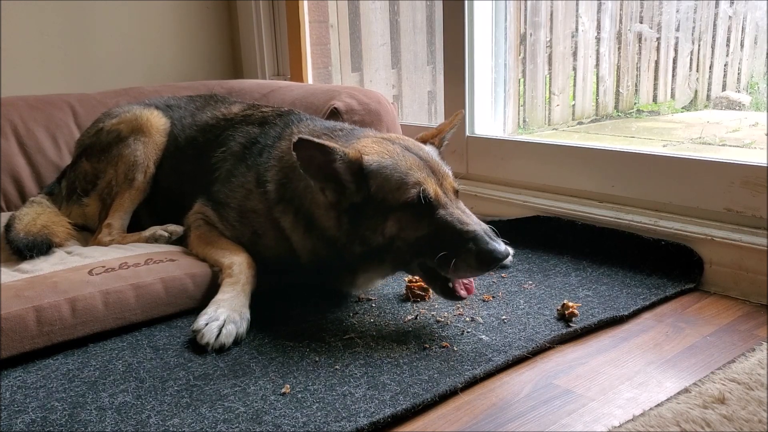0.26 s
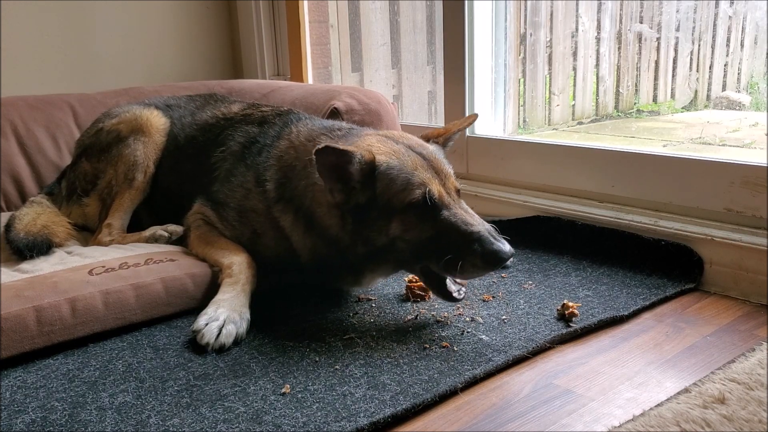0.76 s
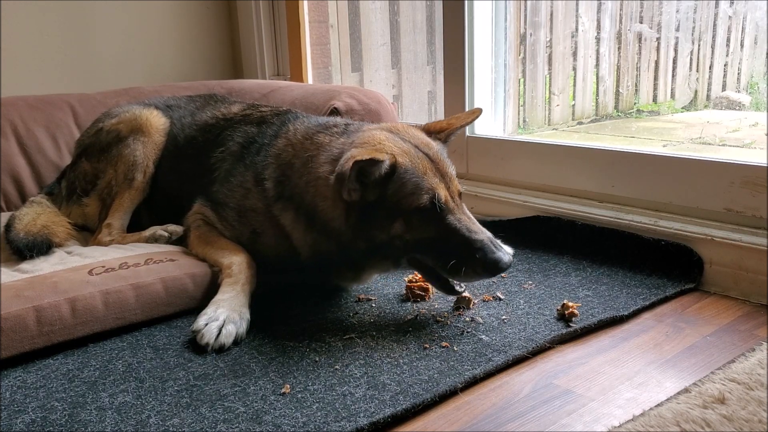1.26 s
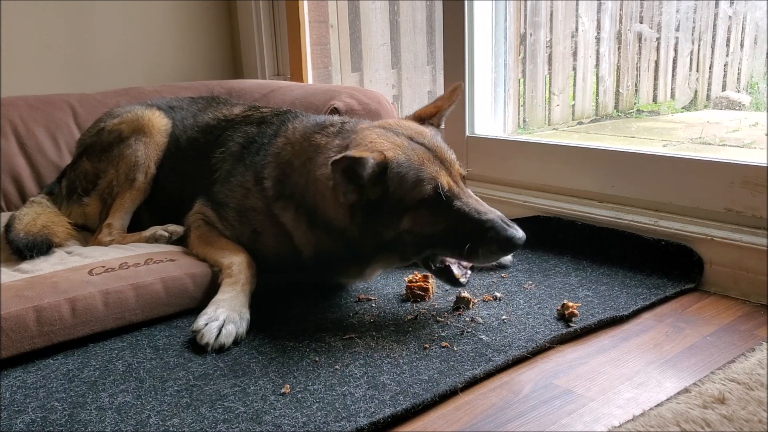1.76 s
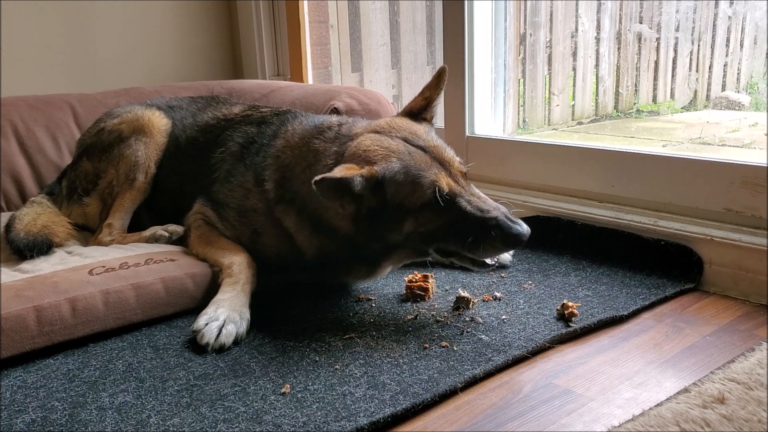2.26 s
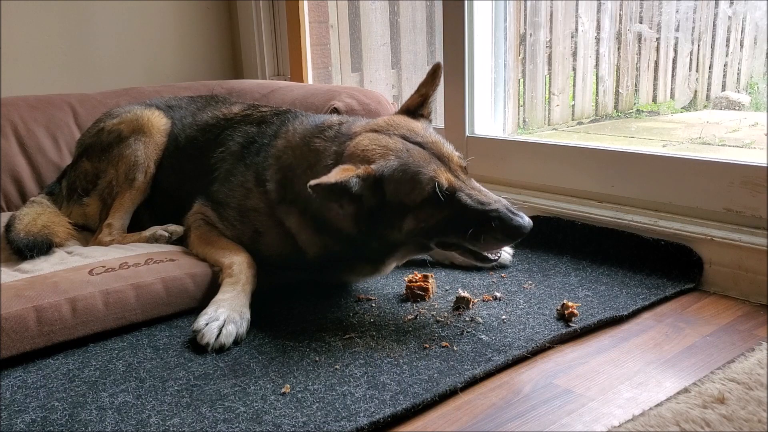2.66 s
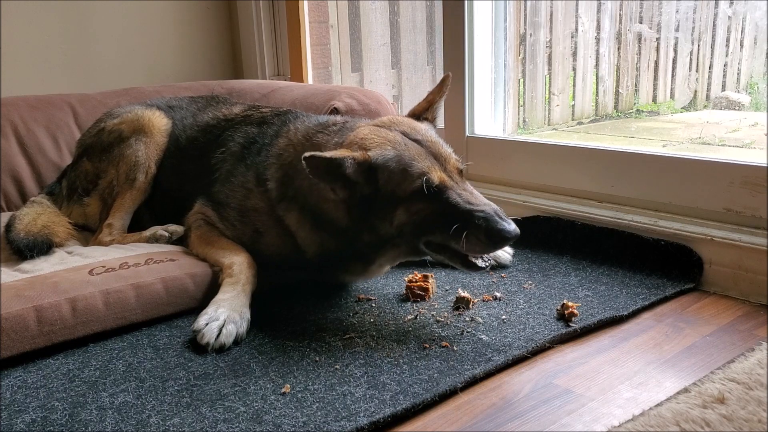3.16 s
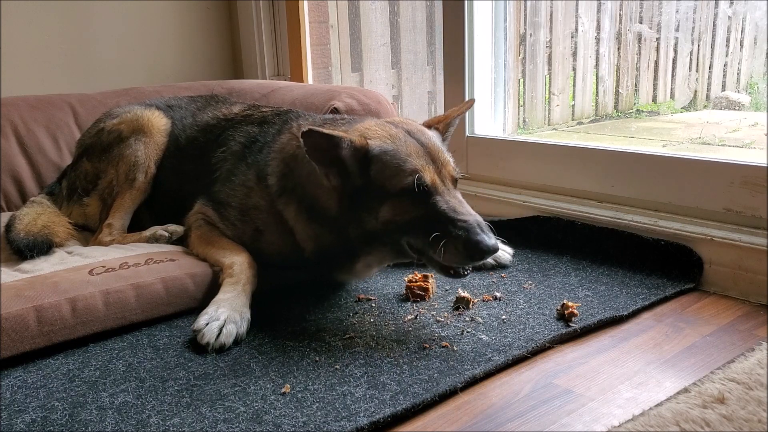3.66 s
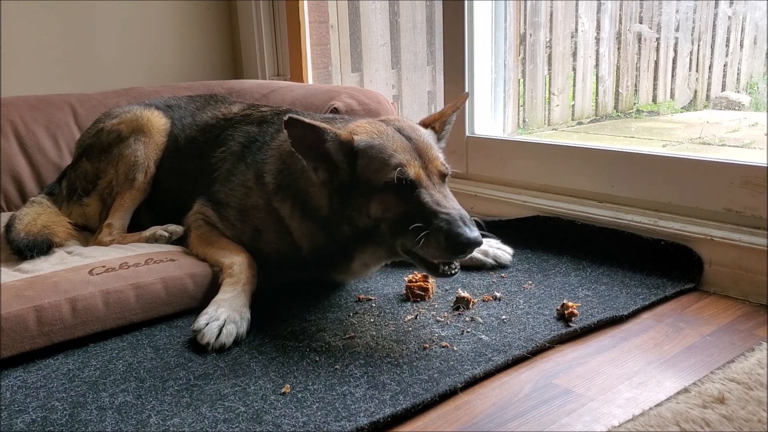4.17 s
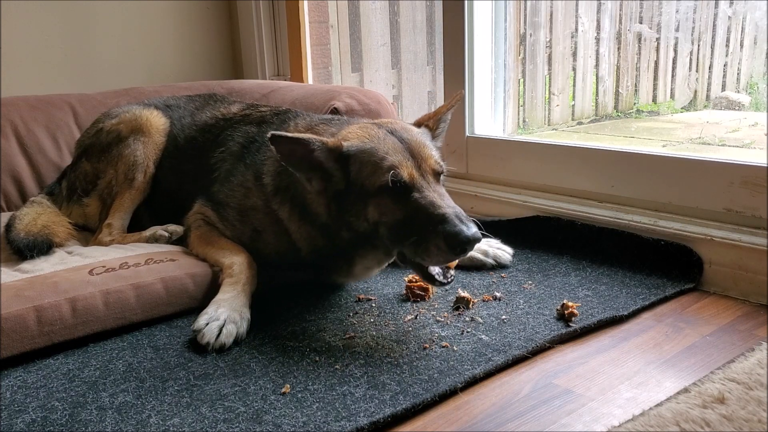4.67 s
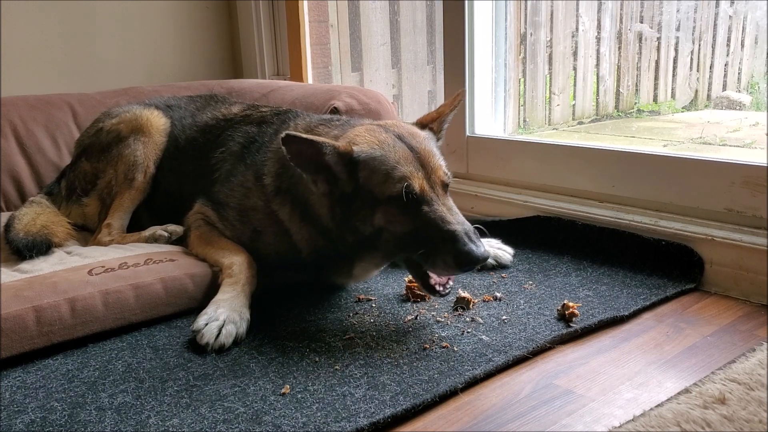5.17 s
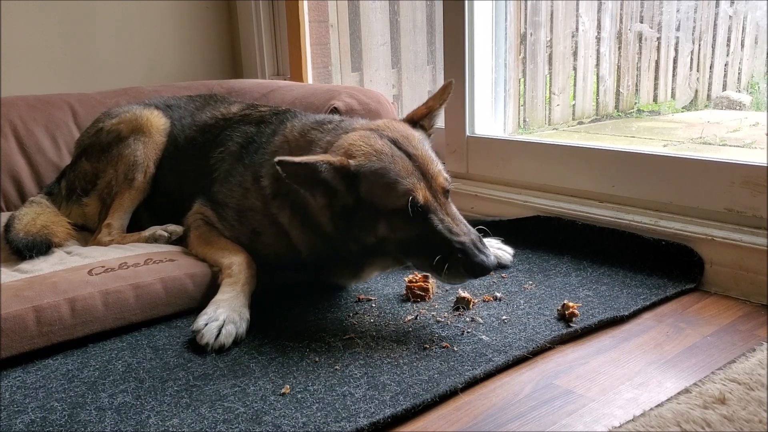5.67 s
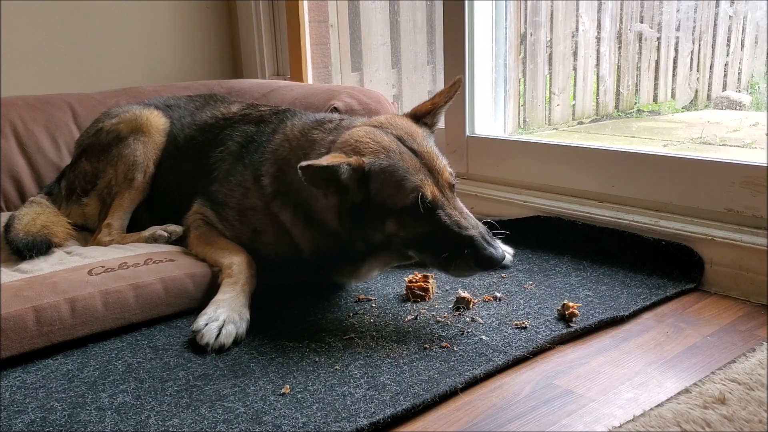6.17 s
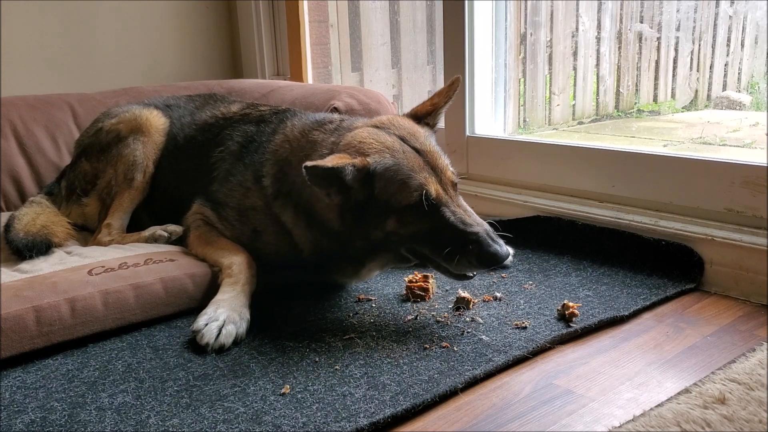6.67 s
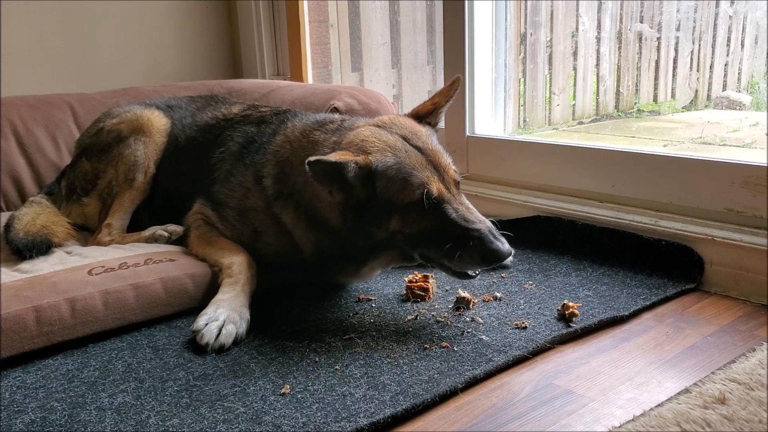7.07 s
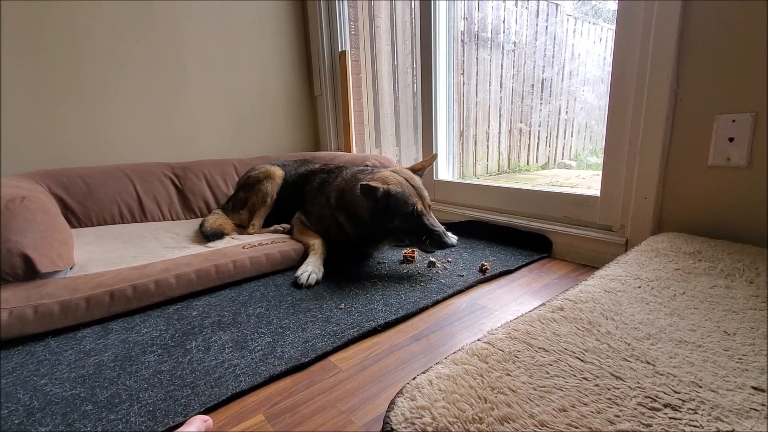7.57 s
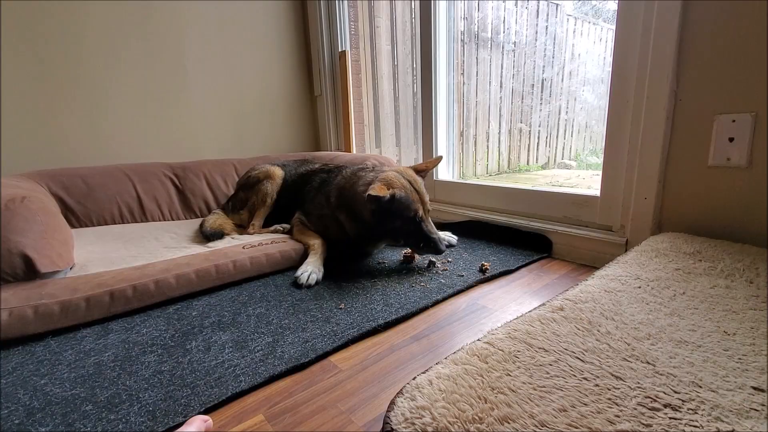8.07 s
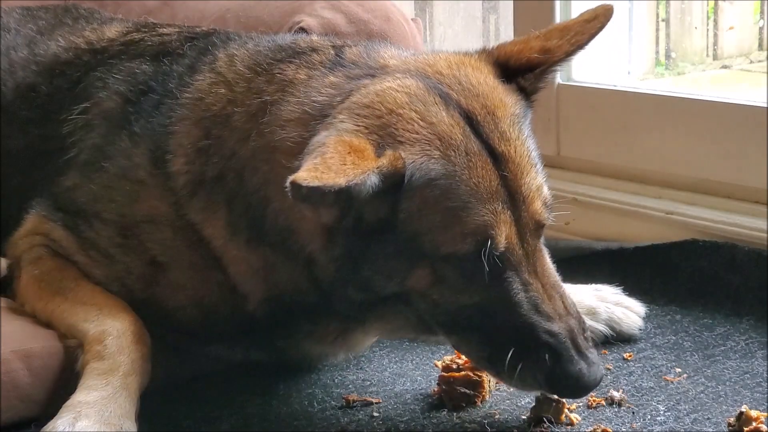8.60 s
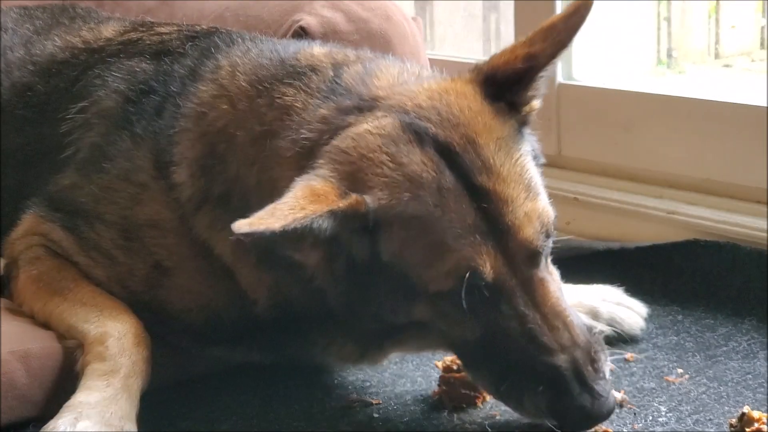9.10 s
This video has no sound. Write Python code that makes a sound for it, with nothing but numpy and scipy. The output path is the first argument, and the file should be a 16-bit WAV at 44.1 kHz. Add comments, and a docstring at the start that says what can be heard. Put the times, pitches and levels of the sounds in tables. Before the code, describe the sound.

Hard bone splits in a dog's jaws with ragged snaps, hollow knocks and short gritty grinding. Between irregular bites the lips and tongue make light, wet clicks and brief squelches. The strongest cracks come shortly after three seconds; the ending fades to faint licking. Heard close up in a quiet furnished room with short reflections, soft air rumble, steady low hum and faint hiss.

```python
"""Dog chewing a dried bone

A dog by a glass door cracks a hard dried bone: ragged noise volleys ring the bone and mouth, with jolts of the jaw.
Random clicks make its crumbs and scrapes; bursts and pops through mouth resonances make smacks and squelches.
Quick echoes off floor and door thicken the bites and licks, and a noise tail makes the small room ring briefly.
Underneath lie shaped noise for still air, a steady appliance hum and a faint hiss that rises with the cracks."""
import sys
import numpy as np
from scipy import signal
from scipy.fft import rfft, irfft
from scipy.io import wavfile
from scipy.ndimage import uniform_filter1d

SR = 44100
rng = np.random.default_rng(int(sys.argv[2]) if len(sys.argv) > 2 else 0)


def wav_out(sig):
    """Save sig, one row per channel (or a flat mono array), as 16-bit PCM at SR to the path in sys.argv[1]."""
    wavfile.write(sys.argv[1], SR, np.round(np.clip(np.atleast_2d(sig).T, -1, 1) * 32767).astype(np.int16))


N = 411894  # length in samples

# Fractures of the bone, one a row:
# start_s, level_db (knock and snap together), brightness_db (snap over hollow knock)
FRACTURES = [(0.0087, -52, 11), (0.035, -46.5, 15), (0.0715, -50, 1), (0.1074, -46, 4), (0.3735, -51, 10.5),
             (0.4176, -39, 12), (0.447, -36, 7), (0.4564, -41, 5), (0.4673, -42.5, 4), (0.4962, -48, -15),
             (0.5549, -45.5, 17), (0.5881, -39, -17), (0.5917, -34, 0.5), (1.0504, -55.5, 6),
             (1.0666, -40, 2), (1.1772, -60, 8), (1.304, -62.5, 0), (2.3554, -58.5, 4.5), (2.381, -67, 8),
             (3.1195, -55, 4), (3.1607, -42.5, 1.5), (3.3221, -26, 6.5), (3.417, -23.5, 4.5),
             (3.4285, -38, 5), (3.4742, -30.5, -4), (4.185, -38, 4), (4.205, -39.5, 1.5), (4.521, -50, 3),
             (4.5777, -60, 8), (4.6048, -40.5, 2.5), (4.868, -62, 44), (5.0142, -51.5, -2.5),
             (5.2708, -60.5, 21), (5.306, -46.5, 18.5), (5.336, -43.5, 11.5), (5.355, -39, 9.5),
             (5.3656, -37.5, 6.5), (5.4529, -48.5, -10), (5.4682, -35, -2.5), (6.5986, -50, -2.5),
             (6.6406, -43, -7), (6.891, -59.5, 30), (7.166, -33, 13), (7.1756, -47, 4),
             (7.241, -31.5, -6.5), (7.2924, -38.5, -2), (7.2994, -42, 0), (7.6127, -53.5, 3.5),
             (7.6941, -46.5, 12), (7.7291, -35, 2), (7.7394, -38, -7), (8.1453, -33.5, -5),
             (8.1942, -33.5, -3.5), (8.2672, -42.5, 5), (8.297, -48.5, -11)]


def fractures(crack_db=0, crack_room_db=0, thump_db=3, thinning=0.22, shift=0.03):
    """Thin pieces snap and splinter, thick ones knock, and each jolts the jaw: (near, to the room, jaw)."""
    bone, bone_far, jaw = np.zeros((3, 2, N))
    slips = rng.standard_normal(len(FRACTURES))
    for (s, level_db, bright_db), slip in zip(FRACTURES, slips):
        hollow_hz, jaw_hz, thud_db, splinter_db = grip(s)
        knock_db = -10 * np.log10(1 + amp(bright_db) ** 2)  # knock and snap share the level
        snap_db = knock_db + bright_db
        tilt_db = thinning * bright_db  # a brighter crack has less thud and more splinter
        parts_db = level_db + np.array([thud_db - tilt_db, knock_db, snap_db, splinter_db + tilt_db])
        slipped_hz = hollow_hz * np.exp(shift * slip)  # the piece slips a little at each crack
        start, near, far = crack(s, parts_db + crack_db, slipped_hz)
        add(bone, start, near)
        add(bone_far, start, far * amp(crack_room_db))
        add(jaw, s, thump(parts_db[0] + thump_db, jaw_hz))
    return bone, bone_far, jaw


def crack(s, parts_db, hollow_hz, run_s=.0011, trail_s=.032, trail=.05, lead=.06, lead_s=.0018,
          ragged=.7, scatter=.7, size=4096):
    """Bone starts to give, splits in a ragged volley and sheds splinters: (start s, near, to the room)."""
    start = size // 16
    t = (np.arange(size) - start) / SR
    breaks, splinters, chance = rng.standard_normal((3, size))
    breaks *= np.exp(ragged * chance.clip(-2, 2))
    giving = lead * np.exp(-abs(t) / lead_s)
    splitting = np.exp(-abs(t) / run_s)
    volley = evened(breaks) * np.where(t < 0, giving, splitting)
    debris = evened(splinters * (abs(splinters) > 2.9))  # only the rare large values
    volley += debris * trail * np.exp(-abs(t) / trail_s) * (t > 0)  # a few splinters snap off later
    near = near_echoes(volley)
    # summed over all directions, the volley reaches the walls almost as one plain click
    far = (t == 0) + scatter * evened(near) / np.sqrt(size)
    return s - start / SR, voiced(near, parts_db, hollow_hz), voiced(far, parts_db, hollow_hz)


# Band edges of a crack, from thud through knock and snap to splinter: edge_hz
PART_EDGES_HZ = [130, 450, 1800, 6000, 16000]
# Ring of the bone in the jaws, before the bands are levelled: freq_hz, gain_db
BONE_RING = [(60, -3.5), (130, -1.5), (190, 6), (260, -5), (350, 3.5), (480, 0), (700, 2.5), (1100, 2),
             (1500, -.5), (2000, 1), (4500, 2.5), (7000, -4), (9800, 3.5), (16000, -8.5)]


def voiced(x, parts_db, hollow_hz, hollow=0.94, hollow_q=5, body_s=0.006):
    """The hollow of bone and mouth rings, then each band is set to its level, held over body_s."""
    size = x.shape[1]
    ringing = signal.lfilter(*signal.iirpeak(hollow_hz, hollow_q, SR), x)
    x = colour(x + hollow * ringing, BONE_RING)
    power = 2 * (abs(rfft(x)) ** 2).mean(0) / (size * body_s * SR)
    hz = np.fft.rfftfreq(size, 1 / SR)
    own_db = 10 * np.log10(np.histogram(hz, PART_EDGES_HZ, weights=power)[0])
    centres = np.sqrt(np.multiply(PART_EDGES_HZ[1:], PART_EDGES_HZ[:-1]))
    return colour(x, np.c_[centres, parts_db - own_db])


def thump(scale_db, hz, fade_s=0.0063, rise_s=0.0028, size=2048):
    """Skull and jaw shudder for a few cycles: a sine that swells and dies, alike on both sides."""
    t = np.arange(size) / SR
    envelope = (1 - np.exp(-t / rise_s)) * np.exp(-t / fade_s)
    return amp(scale_db) * np.tile(np.sin(2 * np.pi * hz * t) * envelope, (2, 1))


# Bites, one a row; the grip on the bone colours all the cracks nearest to it:
# start_s, grinding_length_s (clicks last 0.02 s or more), grinding_db, hollow_hz (before slips), jaw_hz,
# then, relative to the crack and before its brightness tilt: thud_db, splinter_db
BITES = [(0.005, 0.12, -59.5, 1120, 195, -11.5, -17.5), (0.419, 0.097, -56, 1080, 185, -7.5, -15.5),
         (1.068, .04, -59.5, 1460, 185, -4, -25.5), (1.11, .25, -77.5, 940, 190, -25, -4),
         (2.33, 0.084, -71.5, 690, 325, 4, -5.5), (3.11, 0.024, -67, 1300, 234, 4.5, -21),
         (3.159, 0.018, -65.5, 704, 210.5, -17, -5), (3.32, 0.2, -54, 1760, 292.6, -12.5, -8.5),
         (4.183, 0.062, -57.5, 830, 262, -16.5, -17), (4.52, 0.054, -56, 653, 192, -11, -7),
         (4.89, 0.14, -61.5, 1730, 196, -4, -3), (5.31, 0.088, -49, 1160, 166, -10, -10),
         (5.449, 0.051, -58, 1160, 167, -9, -1), (6.598, 0.04, -64, 800, 203, -17.5, -10),
         (7.165, .05, -48.5, 1870, 112, -6, -10), (7.24, .06, -60, 865, 180, -15.5, -3.5),
         (7.691, 0.028, -56.5, 1120, 185, -11, -8.5), (8.146, 0.081, -57.5, 1010, 164.6, -9.5, -12)]
GRIP_S, GRIP_DB = .14, -77.5  # scrape of the teeth as they feel for a hold


def grinding():
    """Teeth scrape for a hold ahead of each bite (from time 0 at the earliest), then grind the bone."""
    teeth = np.zeros((2, N))
    for start, length_s, level_db, *_ in BITES:
        add(teeth, start - GRIP_S, grind(GRIP_S, GRIP_DB))
        add(teeth, start, grind(length_s, level_db))
    return teeth


def grip(s):
    """The bite nearest to time s: (hollow Hz, jaw Hz, jaw thud dB, splinter dB)."""
    return min(BITES, key=lambda bite: abs(s - bite[0] - bite[1] / 2) - bite[1] / 2)[3:]


# Colour of the crumbs, also of the bare click in a smack: freq_hz, gain_db
CRUMB_COLOUR = [(100, -18), (400, 1.5), (1000, -3), (3600, 2.5), (7000, -8), (10000, -4.5), (16000, -15)]


def grind(length_s, level_db):
    """Pores of the bone collapse one after another: random clicks with echoes, coloured as crumbs."""
    pores = near_echoes(clicks(length_s, per_s=280, spread_db=7))
    return amp(level_db) * evened(colour(pores, CRUMB_COLOUR))


# Wet smacks of lips (high) or tongue (low), one a row:
# start_s, level_db, cavity_hz, cavity_width_hz (nominal, scaled for each resonance)
SMACKS = [(0.301, -65, 3080, 910), (0.32, -59.5, 2900, 450), (0.9477, -66, 3500, 1600),
          (1.4197, -64, 1070, 450), (1.913, -53, 3820, 900), (2.2772, -61.5, 2920, 524),
          (2.2969, -59, 2870, 380), (2.694, -47.5, 3110, 427), (2.715, -51, 2790, 400),
          (3.0732, -50, 3230, 450), (3.09, -55.5, 3200, 450), (3.295, -67, 3420, 400),
          (3.7213, -64.5, 4630, 878), (4.0763, -43, 4280, 735), (4.081, -50.5, 4300, 680),
          (4.144, -49.5, 4130, 570), (4.4217, -55, 3030, 725), (4.9134, -44.5, 3600, 560),
          (4.9385, -49.5, 3250, 684), (5.3857, -43, 3120, 440), (5.7712, -67, 1510, 593),
          (6.079, -56.5, 4250, 1270), (6.5315, -61.5, 3500, 1300), (6.951, -58, 4360, 1310),
          (7.035, -55, 4320, 1400), (7.0516, -54, 2570, 1500), (7.08, -53.5, 1010, 400),
          (7.13, -52.5, 860, 402), (7.4685, -64.5, 1325, 805), (8.004, -58.5, 798, 725),
          (8.5375, -64.5, 833, 383), (9.141, -61.5, 835, 200), (9.1883, -65.5, 837, 337)]
# Tongue rolling the piece into place, one squelch a row: start_s, length_s (before a short rest), level_db, cavity_hz
SQUELCHES = [(1.367, 0.059, -76, 1080), (1.698, 0.066, -74.5, 760), (2.11, 0.059, -81, 1960),
             (2.8, 0.29, -101, 3070), (3.998, 0.07, -79, 1750), (4.752, 0.047, -82, 4700),
             (6.457, .07, -84, 1780), (6.857, 0.051, -71.5, 1390), (7.496, .06, -78, 1230),
             (7.618, 0.036, -61.5, 553), (8.007, 0.099, -70.5, 613)]


def licking(smack_db=0, faint_db=-73, faint_range_db=10, slide_db=-87, count=26):
    """Lips and tongue: clear smacks and squelches, and faint ones scattered over the whole time."""
    mouth = np.zeros((2, N))
    for s, level_db, hz, width_hz in SMACKS:
        add(mouth, *smack(s, level_db + smack_db, hz, width_hz))
    for start, length_s, level_db, hz in SQUELCHES:
        add(mouth, start, squelch(length_s, level_db, hz))
    for when, force, opening in rng.random((count, 3)):
        level_db = faint_db - faint_range_db * force
        add(mouth, *smack(when * N / SR, level_db, 900 + 4000 * opening, 900))
    for when, opening in rng.random((count // 2, 2)):
        add(mouth, when * N / SR, squelch(0.12, slide_db, 800 + 1400 * opening))
    return mouth


def smack(s, level_db, hz, width_hz, rise=.05, pop_s=.0016, peel=.075, peel_s=.007, tick=.4,
          tick_width_hz=550, cheek=.16, body_s=.008, size=2048):
    """A film of saliva peels apart and pops, ringing the gap at the lips and the deeper pouch of the cheek."""
    start = size // 4
    t = (np.arange(size) - start) / SR
    popping = np.exp(-abs(t) / pop_s) * (t >= 0)
    peeling = peel * np.exp(-abs(t) / peel_s)
    film = rng.standard_normal(size) * (popping + peeling)
    gap = cavity(film, hz, 1.8 * width_hz, rise)
    lips = cavity(gap, hz * (1 - rise / 2), 1.1 * width_hz, rise)
    pouch = cavity(film, hz / 2, width_hz, rise)
    # a wide open mouth rings less and lets the bare click out
    bare = min(tick * (width_hz / tick_width_hz) ** 2, 1)
    pop = lips + cheek * pouch + bare * evened(colour(film[None], CRUMB_COLOUR)[0])
    held = np.sqrt(body_s * SR / size)  # the level holds over body_s
    return s - start / SR, amp(level_db) * evened(near_echoes(pop, strength=1.0)) * held


def squelch(length_s, level_db, hz, width=0.13, rise=0.045):
    """Many small wet pops ring the cavity as the tongue slides."""
    pops = clicks(length_s, per_s=100, spread_db=4.5)
    ring = cavity(cavity(pops, hz, 2 * width * hz, rise), hz, 2 * width * hz, rise)
    return amp(level_db) * evened(near_echoes(ring * signal.windows.tukey(len(ring), .5)))


def cavity(x, hz, width_hz, rise):
    """Resonance of the mouth, whose pitch rises as it opens."""
    glide_hz = hz * (1 + rise * np.linspace(-.5, .5, len(x)))
    turn = np.exp(2j * np.pi * np.cumsum(glide_hz) / SR)
    r = np.exp(-np.pi * width_hz / SR)
    return evened((turn * signal.lfilter([1 - r], [1, -r], x / turn)).real)  # low-pass around the glide


def clicks(length_s, per_s, spread_db):
    """A random train of tiny clicks, a few of them larger, and a short rest after it."""
    chance, sign, extent = rng.random((3, SR // 2))[:, :int(max(length_s, .02) * SR)]
    sizes = amp(spread_db * np.minimum(-np.log(extent), 3))
    train = (chance < per_s / SR) * np.sign(sign - .5) * sizes
    return np.pad(train, (0, SR // 100))


def near_echoes(x, span_s=.0046, fade_s=0.0098, strength=1.37, spread_s=.0001, count=14):
    """Direct sound, then quick echoes off floor, door and sill, drawn afresh each time as the head moves."""
    delay = rng.uniform(.0003, span_s, count)
    height = evened(rng.standard_normal(count) * np.exp(-delay / fade_s))
    height = strength * height / np.sqrt(count)
    skew = spread_s * rng.standard_normal(count) / 2  # each echo reaches one microphone first
    paths = np.zeros((2, SR // 50))
    paths[0, 1] = paths[1, 0] = 1  # direct sound, one sample earlier on the right
    for path, side in zip(paths, (1, -1)):
        np.add.at(path, (abs(delay + side * skew) * SR).astype(int), height)
    return signal.fftconvolve(x[None], paths, axes=1)[:, :len(x)]


# Decay of the room: freq_hz, t60_s
ROOM_T60 = [(150, 0.32), (500, 0.4745), (1500, 0.3754), (4000, 0.388), (9000, 0.32), (16000, 0.14)]
# Level of its tail, before the nearest wall is lifted: freq_hz, level_db
ROOM_DB = [(80, -4.5), (200, -0.5), (500, -0.5), (1500, 1), (4000, 0), (9000, -3.5), (16000, -4)]
# Left-right likeness of its tail: freq_hz, likeness (0 to 1)
ROOM_SAME = [(60, 0.44), (200, .88), (500, .35), (1200, 0.026), (8000, 0.01)]


def room(x, first_s=.0088, wall=0.67, wall_s=0.0064, patchy_db=2.0, step_count=8):
    """Walls and ceiling answer after a short gap; each band of the tail dies at its own speed."""
    at = np.arange(0, SR - step_count, step_count)
    at = at + rng.integers(0, step_count, (2, len(at)))  # one reflection in each small step
    taps = np.zeros((2, SR))
    np.put_along_axis(taps, at, rng.choice([-1., 1.], at.shape), 1)
    hz, t, z = signal.stft(evened(taps), SR, nperseg=256)
    same = np.clip(read(ROOM_SAME, hz), 0, 1)[:, None]  # long waves reach both microphones more alike
    z[1] = same * z[0] + np.sqrt(1 - same ** 2) * z[1]
    fade_s = read(ROOM_T60, hz)[:, None] / np.log(1000)
    z *= amp(read(ROOM_DB, hz))[:, None] * np.exp(-t / fade_s) * np.sqrt(2 / (fade_s * SR))
    patches = uniform_filter1d(rng.standard_normal(z.shape[1:]), 5, 0)
    patches = evened(uniform_filter1d(patches, 2, 1))
    z *= evened(amp(patchy_db * patches))  # furniture returns the sound in uneven clumps
    tail = signal.istft(z, SR, nperseg=256)[1]
    tail *= 1 + wall * np.exp(-np.arange(tail.shape[1]) / SR / wall_s)  # the nearest wall is strongest
    delayed = np.pad(tail, ((0, 0), (int(first_s * SR), 0)))
    return signal.fftconvolve(x, delayed, axes=1)[:, :N]


# Thin part of the hiss, evened after shaping: freq_hz, gain_db
HISS_THIN = [(200, -16), (1200, -5), (3000, -3.5), (7000, -6), (9500, 0.5), (12500, -5.5), (16000, -4.5)]
# Lower, fuller part, which comes forward when the hiss is strong: freq_hz, gain_db
HISS_BODY = [(100, -5.5), (500, 3), (1300, -6), (3000, -5), (7000, -9.5), (16000, -21)]


def hiss(level_db, body_db=-6, widening=.7, strong_db=-62, waver_db=2):
    """A faint high hiss wavers, lingers after the harder bites, and grows fuller as it swells."""
    waver = waver_db * evened(uniform_filter1d(rng.standard_normal(N), SR // 12))
    thin = evened(colour(rng.standard_normal((2, N)), HISS_THIN))
    body = evened(colour(rng.standard_normal((2, N)), HISS_BODY))
    fullness = amp(body_db + widening * (level_db - strong_db))
    return amp(level_db + waver) * (thin + body * fullness)


# Longer swells of the hiss, bell-shaped: middle_s, half_length_s (power down to 1/e), level_db (added as power)
HISS_SWELLS = [(3.857, .04, -72.5), (4.799, .06, -71), (5.607, 0.15, -65), (5.947, 0.055, -74.5),
               (8.386, 0.1, -64.5)]


def hiss_level(bone, rest_db=-87, bite_db=-57, follow=0.3, linger_s=0.019):
    """Level of the hiss in dB: it rises with the cracking, sinks slowly back to rest, and now and then swells."""
    t, keep = np.arange(N) / SR, np.exp(-1 / (linger_s * SR))
    cracking = (bone ** 2).mean(0)
    for _ in range(2):
        cracking = signal.lfilter([1 - keep], [1, -keep], cracking)
    power = amp(rest_db) ** 2 + amp(bite_db) ** 2 * cracking ** follow
    for s, half_s, level_db in HISS_SWELLS:
        power = power + amp(level_db) ** 2 * np.exp(-((t - s) / half_s) ** 2)
    return 10 * np.log10(power)


# Still air of the house, before the low cut: freq_hz, density_db (per Hz)
AIR = [(20, -108), (40, -100.5), (56, -81), (80, -84), (125, -92), (180, -93.5), (300, -99), (550, -109),
       (800, -108), (1200, -117), (3000, -125), (7000, -131), (10000, -127), (16000, -131)]
# Left-right likeness of the air: freq_hz, likeness (0 to 1)
AIR_SAME = [(60, 0.94), (200, 0.66), (500, 0.97), (1500, 0.28), (8000, .2)]
HUM_HZ, HUM_DB = 59.9, -66  # rms level before the low cut


def house():
    """Low rumble of still air as shaped noise, and the hum of an appliance as a sine."""
    hz, t = np.fft.rfftfreq(N, 1 / SR), np.arange(N) / SR
    left, other = rfft(rng.standard_normal((2, N)))
    same = np.clip(read(AIR_SAME, hz), 0, 1)
    pair = np.array([left, same * left + np.sqrt(1 - same ** 2) * other])
    air = irfft(pair * amp(read(AIR, hz)) * np.sqrt(SR / 2), N)
    hum = amp(HUM_DB) * np.sqrt(2) * np.sin(2 * np.pi * HUM_HZ * t)
    return air + hum


def amp(db):
    """Decibels to gain."""
    return 10 ** (np.asarray(db) / 20)


def evened(x):
    """Scales to an rms of one."""
    return x / np.sqrt(np.mean(x ** 2) + 1e-20)


def read(points, hz):
    """A table joined by straight lines on a log-frequency axis."""
    f, value = np.transpose(points)
    return np.interp(np.log(hz + 1), np.log(f + 1), value)


def add(mix, s, sound):
    """Lays a two-channel sound into the mix at time s, or at the start if s is negative."""
    part = mix[:, max(round(s * SR), 0):][:, :sound.shape[1]]
    part += sound[:, :part.shape[1]]


def colour(x, points, size=2048):
    """Causal filter with the given (Hz, dB) shape: nothing sounds ahead of a click."""
    log_gain = np.log(amp(read(points, abs(np.fft.fftfreq(size, 1 / SR)))))
    ring = np.fft.ifft(np.exp(np.conj(signal.hilbert(log_gain)))).real[:size // 2]
    return signal.oaconvolve(x, ring[None], axes=1)[:, :x.shape[1]]


def scene():
    """All the sounds of the mouth, their room, and the background."""
    bone, bone_far, jaw = fractures()
    mouth = jaw + licking() + grinding()
    ringing = room(mouth + bone_far)
    return mouth + bone + ringing + house() + hiss(hiss_level(bone))


EDGE_HZ = 16200  # upper band limit


def record(dry):
    """Low cut of the microphones, the left one a little louder; then the band limit."""
    low_cut = signal.butter(3, 48, "highpass", fs=SR, output="sos")
    heard = signal.sosfilt(low_cut, dry)
    edge = signal.firwin(511, EDGE_HZ, window=("kaiser", 9), fs=SR)
    balance = amp([[.25], [-.25]])  # left, right
    return signal.oaconvolve(heard * balance, edge[None], "same", axes=1)


dry = scene()
out = record(dry)
wav_out(out)
```